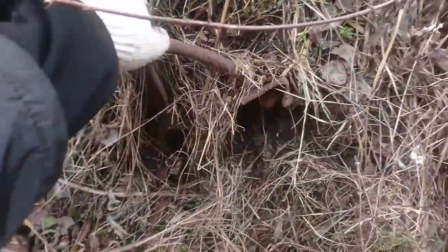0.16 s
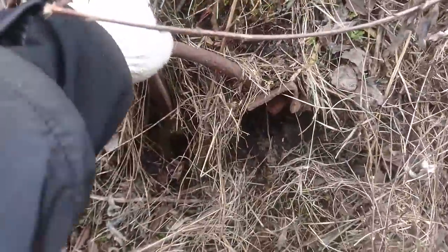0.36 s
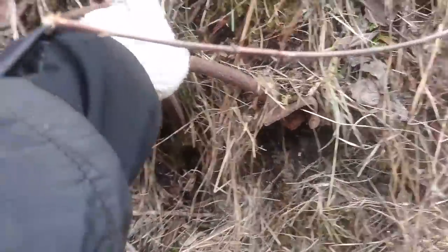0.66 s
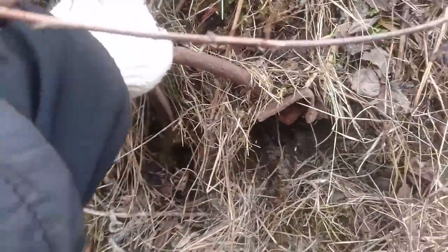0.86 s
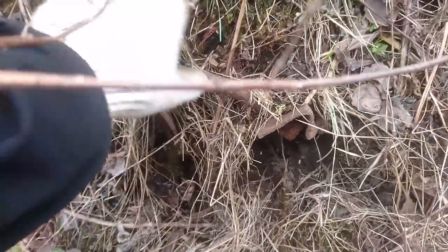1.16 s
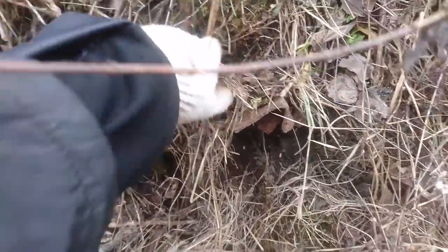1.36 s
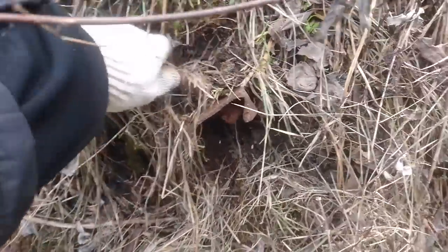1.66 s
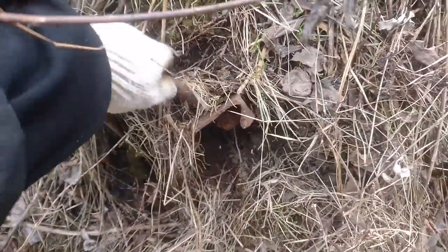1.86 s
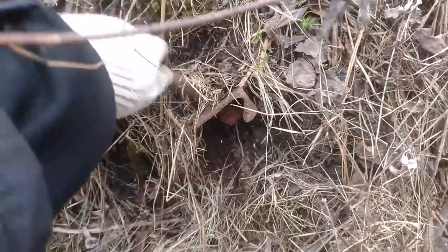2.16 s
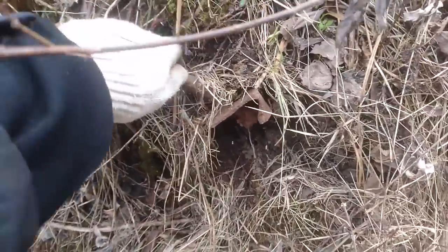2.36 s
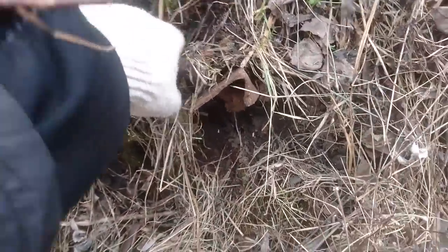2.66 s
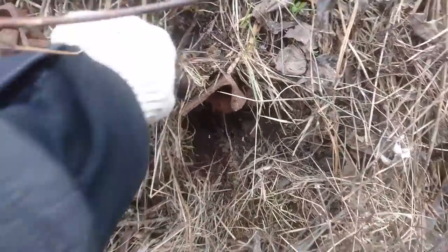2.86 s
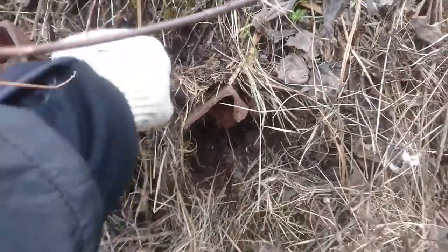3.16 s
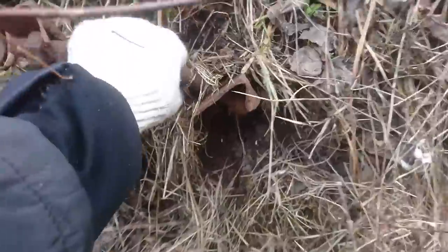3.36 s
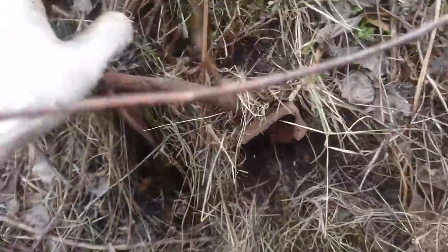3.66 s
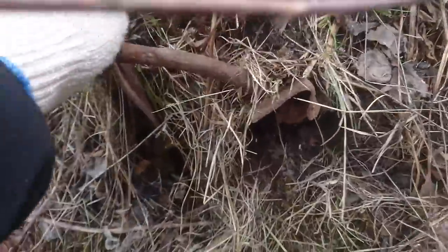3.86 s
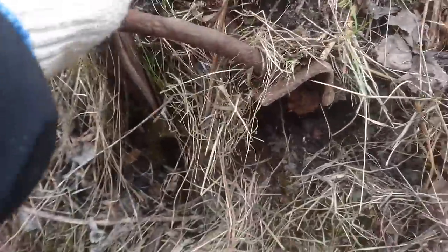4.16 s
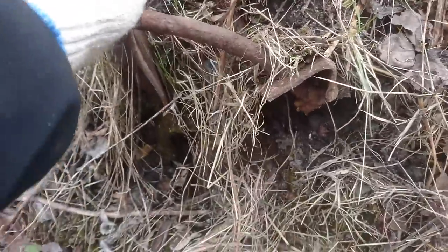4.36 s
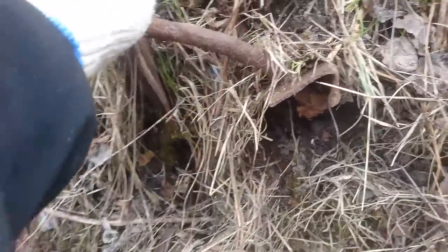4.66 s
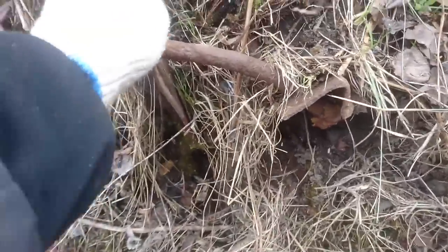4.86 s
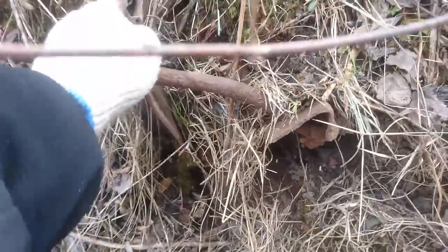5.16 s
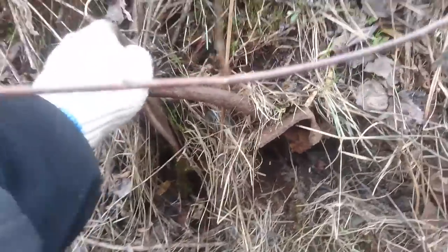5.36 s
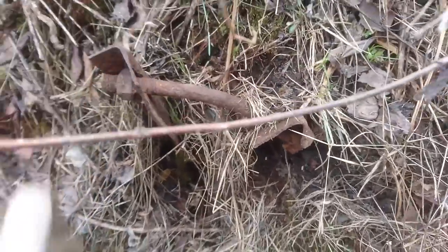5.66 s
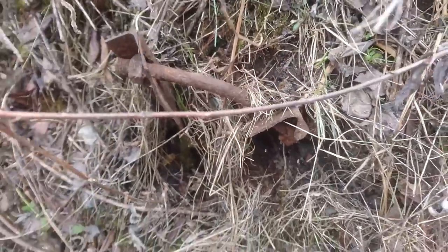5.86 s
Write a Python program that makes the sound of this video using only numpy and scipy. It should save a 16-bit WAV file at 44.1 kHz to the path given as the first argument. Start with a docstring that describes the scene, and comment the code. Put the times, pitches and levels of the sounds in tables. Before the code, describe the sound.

Close stereo sound of someone working rusty metal in dry undergrowth. Jacket fabric brushes and grass crackles throughout over a faint low rumble. Light knocks come first, then about two seconds of uneven, short, rattling clanks and grinding, thudding dully into earth. Afterwards only quiet rustling, tiny stalk snaps and soft padded bumps remain, until quick fabric movement sings upward in pitch at the end.

```python
"""Dry grass within arm's reach of two microphones, over a low outdoor rumble. A padded sleeve swishes
as an arm moves, and stalks snap. A gloved hand works a rusty iron rod to and fro in a half-buried pipe:
faint knocks, then hard clanks and grinding that shake the soil. The iron falls quiet but for a last faint
scrape; cloth, soft bumps and ticking grass remain, and ribbed cloth sings as the arm is pulled away.
Iron, soil and stalks are shaped, resonating noise; cloth is fluttering noise and tones that follow its speed."""
import sys
import numpy as np
from scipy import signal
from scipy.fft import rfft, irfft, next_fast_len
from scipy.io import wavfile

SR = 44100
rng = np.random.default_rng(int(sys.argv[2]) if len(sys.argv) > 2 else 0)


def persist_wave(psi):
    """Save psi, clipped to +-1, as 16-bit WAV."""
    counts = np.round(np.clip(psi, -1, 1) * 32767).astype(np.int16)
    wavfile.write(sys.argv[1], SR, np.atleast_2d(counts).T)


N = 264864   # length in samples
TIME = np.arange(N) / SR   # seconds
GRID = np.maximum(np.arange(4097) * SR / 8192, 1)   # filter frequencies in Hz


def from_db(db):
    """Decibels to gain."""
    return 10 ** (np.asarray(db) / 20)


def rms_one(x):
    """Scale to unit power."""
    return x / np.sqrt(np.mean(x ** 2) + 1e-20)


def at_hz(points, hz):
    """Read a curve on a log-frequency axis."""
    point_hz, value = np.transpose(points)
    return np.interp(np.log(np.maximum(hz, 1)), np.log(point_hz), value)


def add(out, start_s, sound):
    """Mix a stereo sound in at its start time."""
    i = int(np.clip(round(start_s * SR), 0, N - 1))
    out[:, i:i + sound.shape[1]] += sound[:, :N - i]


def drift(rate_hz):
    """Smooth random wander of spread 1: noise through two equal low-pass poles, at a twentieth of SR."""
    pole = np.exp(-40 * np.pi * rate_hz / SR)
    noise = rng.standard_normal(N // 20 + 2002)
    slow = signal.lfilter([1], [1, -2 * pole, pole * pole], noise)[2000:]   # drop the settling
    return np.interp(np.arange(N) / 20, np.arange(len(slow)), rms_one(slow))


def split_filter(x, hz, kind="low", order=2):
    """Keep the part of a sound below or above one frequency."""
    return signal.sosfilt(signal.butter(order, hz, kind, fs=SR, output="sos"), x)


def convolve_unit(x, response):
    """Filter both channels with a response scaled to unit energy."""
    return signal.fftconvolve(x, response[None] / np.linalg.norm(response), axes=1)[:, :N]


def colour(x, curve_db):
    """Causal (minimum-phase) filter of unit power with the given dB curve on GRID."""
    cepstrum = irfft(np.log(from_db(curve_db)))
    half = len(cepstrum) // 2
    folded = np.r_[cepstrum[0], 2 * cepstrum[1:half]]
    response = irfft(np.exp(rfft(folded, 2 * half)))[:half]
    return convolve_unit(x, response)


def resonate(x, hz, width_hz):
    """One resonance of gain 1 at its top."""
    return signal.lfilter(*signal.iirpeak(hz, hz / width_hz, fs=SR), x)


def stroke(middle_s, half_s):
    """One bell-shaped move: the arm speeds up and slows down."""
    return np.exp(-np.minimum(((TIME - middle_s) / half_s) ** 2, 30))


# How alike the two microphones hear iron, soil and stalks, and how alike they hear cloth and air.
# Each row: frequency in Hz, likeness of left and right from 0 to 1.
IRON_LIKENESS = [(100, 1), (1000, 0.81), (2200, 0.52), (3500, 0.61), (7000, 0.222), (16000, .15)]
CLOTH_LIKENESS = [(40, 0.53), (250, 0.93), (800, 0.57), (1600, 0.16), (4000, 0.075), (16000, 0.045)]


def stereo_noise(likeness, lag_ms):
    """White noise at two microphones; the shared part reaches the right one later."""
    size = next_fast_len(N)
    left, other = rfft(rng.standard_normal((2, size)))
    hz = np.arange(len(left)) * SR / size
    alike = np.clip(at_hz(likeness, hz), 0, 1)
    shared = alike * left * np.exp(-2j * np.pi * hz * lag_ms / 1000)
    right = shared + np.sqrt(1 - alike ** 2) * other
    return irfft(np.array([left, right]), size)[:, :N]


def pan(x, right_db):
    """Lean a sound to the right by a level difference between the microphones."""
    return x * from_db(np.array([[-right_db], [right_db]]) / 2)


def friction(spectrum, flutter_db, grain_db):
    """Noise whose level wanders slowly and finely; on cloth, countless fibre slips clumped by folds."""
    unevenness_db = flutter_db * drift(22.6) + grain_db * drift(888)
    slips = stereo_noise(CLOTH_LIKENESS, lag_ms=0.278) * from_db(unevenness_db)
    return colour(rms_one(slips), at_hz(spectrum, GRID))


# Spectrum of the low rumble outdoors.
# Each row: frequency in Hz, relative density in dB per Hz.
RUMBLE = [(20, -38), (40, -11), (54, 7.5), (66, -4.5), (82, 0.5), (120, -9), (220, -9), (330, -11.5),
          (600, -21), (1500, -33.5), (4000, -48)]


def outdoor_rumble():
    """A steady bed of low noise whose level flutters."""
    return from_db(-52.0) * friction(RUMBLE, flutter_db=5.5, grain_db=0.5)


TICKS_PER_S, TICK_T60_S = 14, 0.012
TICK_FLOOR_DB, TICK_SPREAD_DB = -48.5, 4.5
TICK_LOW_HZ, TICK_HIGH_HZ, TICK_WIDTH_HZ = 4990, 7600, 2200


def ticks():
    """Bent blades of grass spring back at random, each a tiny crack at a pitch of its own."""
    out, t = np.zeros((2, N)), TIME[:SR // 40]
    noise = stereo_noise(IRON_LIKENESS, lag_ms=0.13)
    shape = from_db(-60 * t / TICK_T60_S)
    for when, size, pitch in rng.random((int(TICKS_PER_S * N / SR), 3)):
        i = int(when * (N - len(t)))
        hz = TICK_LOW_HZ + pitch * (TICK_HIGH_HZ - TICK_LOW_HZ)
        flick = resonate(noise[:, i:i + len(t)] * shape, hz, TICK_WIDTH_HZ)
        db = TICK_FLOOR_DB + TICK_SPREAD_DB * min(-np.log(1 - size), 2.5)   # few are much louder
        add(out, i / SR, from_db(db) * rms_one(flick) * np.sqrt(np.mean(shape ** 2)))
    return out


# Spectrum of breaking and ticking dry stalks, also used for the snaps further down.
# Each row: frequency in Hz, relative density in dB per Hz.
SNAP = [(200, -19), (650, -14.5), (1500, -25), (3000, -10.5), (5300, -5), (7000, -3), (8300, -12.5),
        (12000, -4.5), (15600, -5.5)]


def crackle(per_s, spread_db):
    """Dry blades of grass tick as the sleeve brushes them: sparse random impulses, coloured."""
    born = rng.random(N) < per_s / SR
    size_db = spread_db * np.minimum(rng.exponential(1, N), 3)
    sizes = from_db(size_db) * rng.standard_normal((2, N))
    return colour(rms_one(born * sizes), at_hz(SNAP, GRID))


# Ribbed cloth slides on cloth and sings, close to the microphones.
# Each row: time of the fastest slide in seconds, speeding up in seconds, slowing down in seconds,
# top rate in ribs per second, share of speed lost at the ends, level in dB before the common trim.
ZIPS = [(3.81, 0.16, 0.054, 1040, 0.025, -57.5), (3.899, .03, 0.082, 1060, .5, -52.5),
        (4.173, 0.053, 0.018, 970, 0.69, -55), (4.268, 0.031, 0.056, 1000, .3, -57),
        (5.84, 0.079, 0.086, 3270, 0.23, -39.5), (5.976, 0.13, 0.074, 4550, 0.55, -35),
        (5.825, 0.0198, .09, 1640, .28, -37), (5.94, .05, 0.07, 3050, 0.25, -41),
        (5.942, 0.068, 0.033, 1470, .15, -47)]


def zips(level_db, wobble, spread, swell):
    """Pitch and level arch with the speed of the passing ribs, blurred by folds that slide unevenly."""
    out = np.zeros((2, N))
    waver = 1 + wobble * drift(327)
    for s, rise_s, fall_s, top_hz, lost, db in ZIPS:
        arch = 1 - np.minimum(((TIME - s) / np.where(TIME < s, rise_s, fall_s)) ** 2, 1)
        ribs_per_s = top_hz * (1 - lost * (1 - arch)) * waver
        phase = 2 * np.pi * np.cumsum(ribs_per_s) / SR
        blur = drift(spread * top_hz) + 1j * drift(spread * top_hz)
        tone = np.real(blur * np.exp(1j * phase)) * arch ** swell * from_db(db + level_db)
        out += [tone, np.interp(TIME - 0.0003, TIME, tone)]   # the right microphone hears it later
    return out


# Spectra of the sleeve's bright swish and of its fuller rub.
# Each row: frequency in Hz, relative density in dB per Hz.
SWISH = [(1000, -30), (2400, -15.5), (3400, -7.5), (4800, 1), (6200, 1), (7100, 0), (8000, -10),
         (10000, -7), (13000, -8.5), (15600, -8)]
RUB = [(150, 1.5), (400, -3.5), (650, -1.5), (1150, -1), (1800, -0.5), (2600, 0.5), (3300, 2.5),
       (5000, -11), (9000, -34.5)]
# The sleeve swishes once with each move of the arm.
# Each row: time of the fastest motion in seconds, half length in seconds, swish drive in dB,
# rub in dB relative to the swish, top octave in dB relative to the swish.
STROKES = [(0.023, .06, -37, -9, 7.5), (0.187, 0.15, -39, -10.5, -1), (0.46, 0.072, -44, -12, 0),
           (0.563, 0.051, -36.5, -17.5, -0.5), (0.798, 0.072, -40.5, -13.5, -3.5),
           (0.93, .04, -48.5, -12, 3), (1.277, 0.042, -43.5, -10, 1.5), (1.569, 0.068, -36, -18, 3),
           (1.66, 0.077, -40.5, -11, 3.5), (1.874, 0.12, -41.5, -8, 1), (2.081, 0.058, -39, -16, -2),
           (2.231, 0.046, -50, 0, 1), (2.415, 0.041, -43.5, 0, -8), (2.544, .03, -45, -19, -4),
           (2.623, 0.038, -44, 0, 1), (2.906, 0.15, -39.5, -13, 4.5), (3.055, 0.038, -30.5, -4.5, 0.5),
           (3.213, 0.077, -42, -14, 1.5), (3.39, 0.075, -35, -9.5, 4), (3.683, 0.14, -41.5, -15, 6.5),
           (3.865, 0.039, -43.5, -11, 1.5), (3.922, 0.085, -45, -5, 4.5), (4.14, 0.066, -40.5, -16, -6),
           (4.272, 0.052, -46.5, -8.5, 0), (4.42, 0.037, -44, -20.5, -0.5), (4.54, 0.02, -48, -21.5, -1),
           (4.684, 0.028, -42.5, -19, 3), (4.925, 0.035, -46.5, -15, -1), (5.348, 0.036, -46.5, -13.5, -4),
           (5.449, 0.023, -48.5, -7.5, -6), (5.75, 0.13, -40, -18, 2.5), (5.908, 0.12, -34.5, -6, 2)]
RESTING_DB, RESTING_RUB_DB, RESTING_TOP_DB = -48, -17, -2.5   # the last two relative to the first
FIDGET_DB, FIDGET_RATE_HZ = 1.2, 8


def sleeve():
    """Each arm move drives swish, ticking grass and rub, adding in power; between moves the cloth creeps."""
    resting = from_db(RESTING_DB + FIDGET_DB * drift(FIDGET_RATE_HZ))
    power = np.outer(from_db([0, RESTING_RUB_DB, RESTING_TOP_DB]), resting) ** 2
    for s, half_s, db, rub_db, top_db in STROKES:
        power += np.outer(from_db([db, db + rub_db, db + top_db]), stroke(s, half_s)) ** 2
    swish_gain, rub_gain, top_gain = np.sqrt(power)
    swish = from_db(-1.27) * friction(SWISH, flutter_db=1.9, grain_db=1.5)
    swish = swish + from_db(-13.5) * crackle(per_s=200, spread_db=-0.5)
    top = signal.sosfiltfilt(signal.butter(4, 7800, "high", fs=SR, output="sos"), swish)
    rub = from_db(1.0) * friction(RUB, flutter_db=-2.2, grain_db=3.0)
    singing = zips(level_db=0.2, wobble=0.016, spread=0.033, swell=0.9)
    return (swish - top) * swish_gain + top * top_gain + rub * rub_gain + singing


# Soft bumps of glove and sleeve.
# Each row: time of the middle in seconds, level in dB, pitch in Hz, half length in seconds.
BUMPS = [(0.86, -46, 111, 0.013), (1.225, -40, 68, 0.013), (2.967, -34, 217, 0.0041),
         (3.435, -31, 85, 0.023), (3.63, -36.5, 207, 0.0025), (4.188, -60, 205, 0.012),
         (4.42, -45.5, 200, 0.013), (4.691, -45.5, 232, 0.013), (4.941, -51.5, 228, 0.02),
         (5.208, -47.5, 223, 0.019), (5.552, -26, 84, 0.0042), (5.948, -31, 75.3, 0.014)]


def bumps():
    """Padded contacts swell and fade as short low tones under a bell-shaped envelope."""
    out = np.zeros(N)
    for (s, db, hz, half_s), phase in zip(BUMPS, rng.uniform(0, 2 * np.pi, len(BUMPS))):
        out += from_db(db) * stroke(s, half_s) * np.cos(2 * np.pi * hz * (TIME - s) + phase)
    return out


# Dry stalks snap in the grass.
# Each row: start in seconds, level in dB before the common trim, pitch of the stalk in Hz.
SNAPS = [(0.025, -48, 5500), (0.395, -17.5, 4600), (0.8006, -29, 3470), (0.9133, -34, 6000),
         (1.753, -36, 5500), (2.9928, -2, 5340), (3.119, -30, 5500), (3.175, -32.5, 6200),
         (4.102, -34.5, 6160), (4.195, -37, 5230), (4.263, -24.5, 4200), (4.757, -47, 7160),
         (5.012, -38, 11700), (5.027, -31.5, 11700), (5.107, -34, 7200), (5.3474, -28, 12200),
         (5.356, -34, 5000), (5.4432, -37.5, 6640), (5.6467, -35, 12500)]


def snaps(level_db, crack_t60, tail_db, tail_t60, stalk_db, stalk_width_hz):
    """A stalk cracks and rings briefly at its own pitch; the grass around scatters a short tail."""
    out, t = np.zeros((2, N)), TIME[:SR // 16]
    noise = stereo_noise(IRON_LIKENESS, lag_ms=0.14)
    shape = from_db(-60 * t / crack_t60) + from_db(tail_db - 60 * t / tail_t60)
    for s, db, hz in SNAPS:
        crack = noise[:, int(s * SR):int(s * SR) + len(t)] * shape
        crack = crack + from_db(stalk_db) * resonate(crack, hz, stalk_width_hz)
        add(out, s, from_db(db + level_db) * rms_one(crack) * np.sqrt(np.mean(shape ** 2)))
    return colour(out, at_hz(SNAP, GRID))


# The soil's answer to a shove.
# Each row: frequency in Hz, relative density in dB per Hz.
SOIL = [(30, -38.5), (60, -15.5), (85, 7.5), (120, -7), (190, 4), (280, 1), (360, -8), (700, -29.5)]


def thuds(rows, wave_db, weight, shudder_db, shudder_t60, start_hz, end_hz, glide_s, rise_s, t60):
    """Loose soil shudders at each shove and sends a ground wave, higher tones first, that grows with weight."""
    waves, shoves, t = np.zeros((2, N)), np.zeros((2, N)), TIME[:SR // 4]
    clods = colour(stereo_noise(IRON_LIKENESS, lag_ms=0.076), at_hz(SOIL, GRID))
    onset = 1 - np.exp(-t / rise_s)
    for (s, db), (pitch_chance, phase) in zip(rows, rng.standard_normal((len(rows), 2))):
        hz = end_hz + (start_hz - end_hz) * np.exp(-t / glide_s)
        hz = hz * np.exp(0.15 * pitch_chance)
        wave = np.sin(2 * np.pi * np.cumsum(hz) / SR + phase) * onset
        fading_db = db + wave_db + weight * (db + 15.0) - 60 * t / t60
        add(waves, s, np.tile(wave * from_db(fading_db), (2, 1)))
        shape = onset * from_db(-60 * t / shudder_t60)
        shudder = np.roll(clods, -int(s * SR), axis=1)[:, :len(t)] * shape
        add(shoves, s, rms_one(shudder) * np.sqrt(np.mean(shape ** 2)) * from_db(db + shudder_db))
    return waves + shoves


# The rod drags over rust inside the pipe.
# Each row: start in seconds, length before the fade-out in seconds, level in dB,
# drive of the freely ringing rod in dB relative to that level.
DRAGS = [(1.673, 0.025, -35.5, -11.5), (1.814, 0.028, -45.5, -2), (1.915, 0.021, -25.5, -16),
         (2.092, 0.046, -37, -16), (2.172, 0.0097, -27, -22), (2.195, 0.009, -18, -35),
         (2.289, 0.074, -50.5, 6.5), (2.401, 0.025, -23, -33), (2.518, 0.046, -51.5, 15),
         (2.61, 0.032, -41.5, -25), (2.806, 0.048, -52.5, 7.5), (3.024, 0.026, -36, -22),
         (3.043, 0.026, -21.5, -34), (3.309, 0.032, -28.5, -15), (3.352, 0.057, -39, -24),
         (4.374, 0.06, -66, 12.5)]


def drags(grit_db, edge_s):
    """Rust catches and slips in uneven grains while the rod slides; gives the force on pipe and on rod."""
    grit = rms_one(stereo_noise(IRON_LIKENESS, lag_ms=0.2) * from_db(grit_db * drift(340)))
    on_pipe, on_rod = np.zeros(N), np.zeros(N)
    for s, length, db, ring_db in DRAGS:
        ramps = np.minimum(TIME - s, s + length + edge_s - TIME) / edge_s
        pressure = from_db(db) * np.clip(ramps, 0, 1)
        on_pipe += pressure
        on_rod += pressure * from_db(ring_db)
    return grit * on_pipe, grit * on_rod


# The rod strikes the pipe.
# Each row: start in seconds, level in dB before the common trim, treble in dB before its own trim,
# drive of the soil thud in dB, favoured resonance in Hz.
CLANKS = [(0.398, -39, -8, -47, 626), (0.686, -36, -4, -48, 700), (0.7995, -45, 3, -43.5, 500),
          (0.853, -50.5, -2, -45.5, 500), (1.053, -46, -2.5, -37, 600), (1.2625, -27, -10, -35, 630),
          (1.621, -25.5, -24, -32, 680), (1.661, -18.5, 3, -31, 1860), (1.669, -9, -4, -27, 1800),
          (1.783, -45.5, -24, -32, 600), (1.8438, -22.5, -28, -25, 1050), (1.8787, -26.5, -21, -32, 940),
          (1.943, -9, -6, -23.5, 1060), (1.958, -22, -14, -37, 755), (2.052, -39, -12, -27.5, 706),
          (2.097, -25.5, -1, -25.5, 590), (2.150, -12, -12.5, -29.5, 1836), (2.193, -15.5, -8, -37, 706),
          (2.209, -6.5, -3, -24, 710), (2.309, -30, -5.5, -27, 496), (2.350, -16.5, -4.5, -28, 1010),
          (2.386, -23.5, -32, -29, 623), (2.401, -19, -9.5, -22.5, 1150), (2.424, -12, -2.5, -25.5, 960),
          (2.519, -41.5, -16, -26, 697), (2.575, -27.5, -16, -30.5, 1070), (2.6, -13.5, -16.5, -32, 1634),
          (2.641, -30.5, -4, -24.5, 1530), (2.653, -28, -38, -44, 900), (2.785, -40.5, -22, -30.5, 1040),
          (2.818, -32.5, -29, -34.5, 955), (3.062, -10.5, -1.5, -17, 1134), (3.215, -34.5, -31, -33, 694),
          (3.253, -41, -29, -32.5, 780), (3.321, -21.5, -27, -21, 940), (3.347, -11.5, 9, -22, 1830),
          (3.404, -30.5, 0, -26, 1850)]
RATTLE_T60_S = 0.03   # the main rattle of every blow dies away alike
FREE_RING_DB = -33   # drive of the rod, relative to the blow, when the row's level is 0 dB
RING_DAMPING = 0.67   # a harder blow presses the rod tighter (dB of drive lost per dB of blow)


def clanks(level_db, treble_db, split_hz, favour_db, favour_width_hz, crush, rise_s, tail_db, tail_t60, grit_db):
    """Each blow is a tight rattle of rusty contacts and a weak shudder; gives the force on pipe and rod."""
    grit = stereo_noise(IRON_LIKENESS, lag_ms=0.2) * from_db(grit_db * drift(600))
    dull = split_filter(grit, split_hz)
    bright = split_filter(grit, split_hz, "high")
    on_pipe, on_rod, t = np.zeros((2, N)), np.zeros((2, N)), TIME[:SR // 5]
    decay = from_db(-60 * t / RATTLE_T60_S) + from_db(tail_db - 60 * t / tail_t60)
    shape = (1 - np.exp(-t / rise_s)) * decay
    for s, db, tilt_db, thud_db, hz in CLANKS:
        part = slice(int(s * SR), int(s * SR) + len(t))
        knock = dull[:, part] * shape
        # the point of contact favours one mode
        knock = rms_one(knock + from_db(favour_db) * resonate(knock, hz, favour_width_hz))
        # harder blows crush the rust finer
        top_hz = np.clip(14000 * from_db(crush * (db + tilt_db - 3)), 7000, 20000)
        crunch = rms_one(split_filter(bright[:, part] * shape, top_hz))
        blow = knock - from_db(tilt_db + treble_db) * crunch
        blow = blow * from_db(db + level_db) * np.sqrt(np.mean(shape ** 2))
        add(on_pipe, s, blow)
        add(on_rod, s, blow * from_db(FREE_RING_DB - RING_DAMPING * db))
    return on_pipe, on_rod


# Modes of the rod when it swings free.
# Each row: frequency in Hz, level in dB before the common trim, time to fall 60 dB in seconds.
ROD = [(1099, -7, 0.11), (3130, -3, .11), (3240, -10.5, .12), (4380, 1, 0.18), (6056, 0.5, 0.136),
       (6150, -3.5, 0.14)]


def rod(force):
    """The loose rod rings on in a few thin modes; the shifting grip damps now one, now another."""
    t, out = TIME[:SR // 3], 0
    for hz, db, t60 in ROD:
        response = from_db(-60 * t / t60) * np.sin(2 * np.pi * hz * t)
        share = from_db(db - 4.5 + 2 * drift(2.2))
        out = out + convolve_unit(force * share, response)
    return out


# Broad colour of iron crushing rust.
# Each row: frequency in Hz, relative level in dB.
RUST = [(60, -26), (170, -23.5), (300, -11.5), (520, -11.5), (900, -10.5), (2000, -17), (2600, -11),
        (4500, -13.5), (6600, -12), (8000, -22), (12000, -22), (16000, -28)]
# Resonances of the half-buried pipe.
# Each row: frequency in Hz, width in Hz, relative level in dB.
PIPE = [(436, 44, 0), (641, 108, -1.5), (1110, 300, -3), (1544, 87, -4), (1780, 90, 2), (1970, 98, -7.5),
        (2214, 160, -0.5), (3080, 29, 2.5), (3305, 94, -2.5), (3694, 90, -3.5), (3850, 44, -8.5),
        (4500, 22, -11), (4790, 210, -5.5), (5520, 49, -3.5), (6160, 110, -9.5), (6450, 120, -4)]


def pipe(force):
    """The soil-damped pipe: short resonances standing on the broad colour of crushed rust."""
    power = from_db(at_hz(RUST, GRID)) ** 2
    for hz, width, db in PIPE:
        power = power + from_db(db) ** 2 / (1 + (2 * (GRID - hz) / width) ** 2)
    return colour(force, 10 * np.log10(power))


def scene():
    """Iron, soil, stalks and sleeve within arm's reach, over a low outdoor rumble."""
    air = outdoor_rumble()
    stalks = snaps(level_db=1.5, crack_t60=0.012, tail_db=-17.5, tail_t60=0.0165,
                   stalk_db=2.5, stalk_width_hz=2340)
    shoves = [(s, thud_db) for s, db, tilt_db, thud_db, hz in CLANKS]
    soil = thuds(shoves, wave_db=3, weight=1.0, shudder_db=-1.5, shudder_t60=0.11,
                 start_hz=239, end_hz=64.8, glide_s=0.0152, rise_s=0.0029, t60=0.2)
    drag_pipe, drag_rod = drags(grit_db=-1, edge_s=0.012)
    blow_pipe, blow_rod = clanks(level_db=-5, treble_db=8.0, split_hz=2500, favour_db=10.5,
                                 favour_width_hz=110, crush=0.18, rise_s=0.001,
                                 tail_db=-18.5, tail_t60=0.078, grit_db=3.5)
    iron = pipe(blow_pipe + drag_pipe) + rod(blow_rod + drag_rod)
    mix = pan(air, right_db=3.0) + pan(sleeve(), right_db=2.0)
    mix = mix + pan(stalks + ticks(), right_db=3.5) + pan(soil + bumps(), right_db=3.5)
    return mix + pan(iron, right_db=2.0)


def record(dry):
    """The microphones shed deep bass, the sharpest peaks overload, and the top is cut."""
    thinned = split_filter(dry, 36, "high", order=3)
    clipped = 1.1 * np.tanh(thinned / 1.1) - 0.0022   # the converter sits a little below zero
    return signal.sosfiltfilt(signal.cheby1(10, 0.1, 15850, fs=SR, output="sos"), clipped)


dry = scene()
out = record(dry)
persist_wave(out)
```